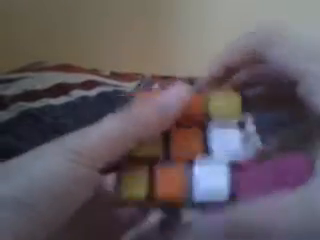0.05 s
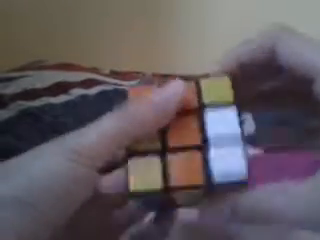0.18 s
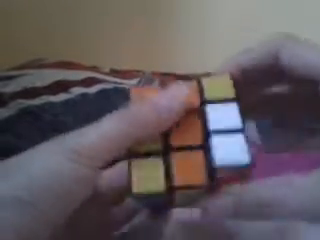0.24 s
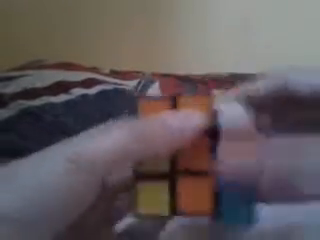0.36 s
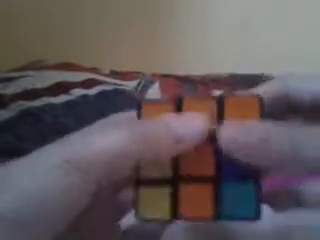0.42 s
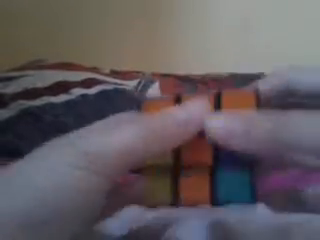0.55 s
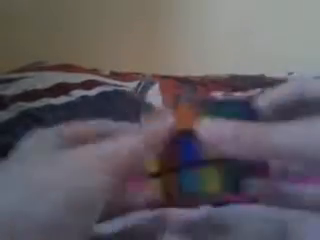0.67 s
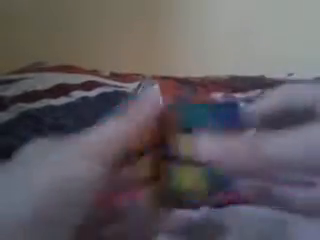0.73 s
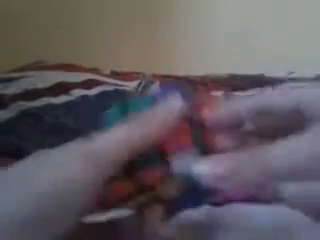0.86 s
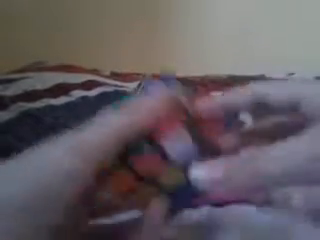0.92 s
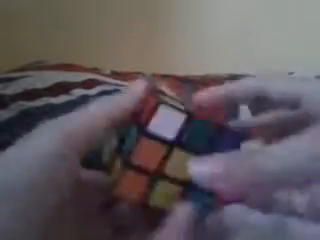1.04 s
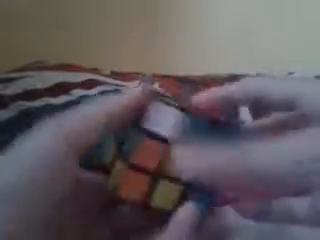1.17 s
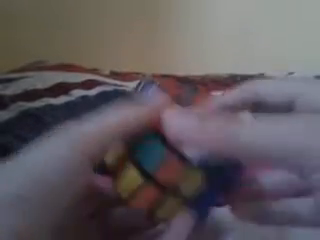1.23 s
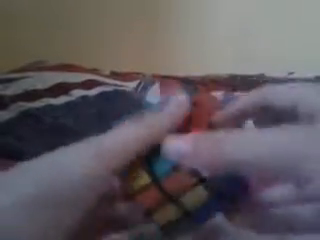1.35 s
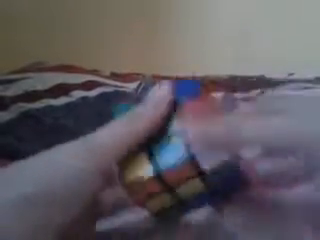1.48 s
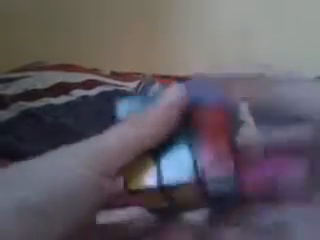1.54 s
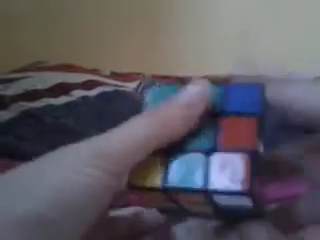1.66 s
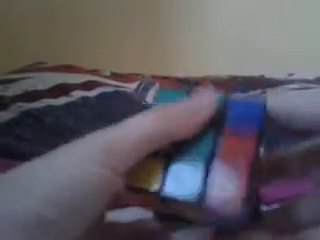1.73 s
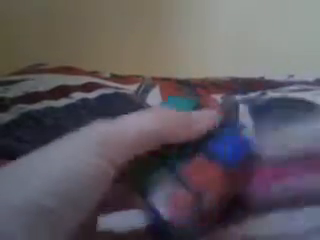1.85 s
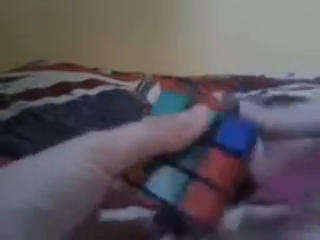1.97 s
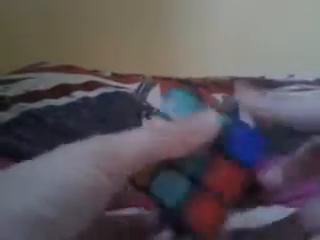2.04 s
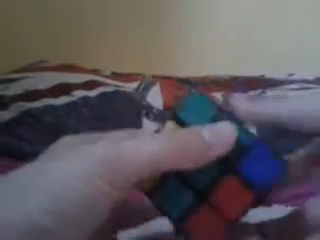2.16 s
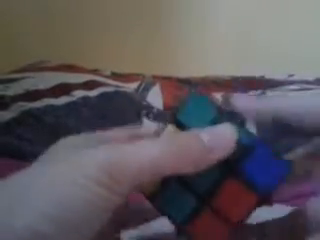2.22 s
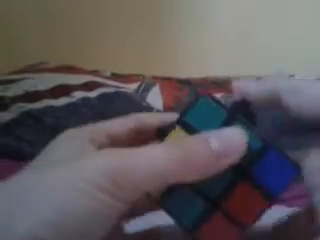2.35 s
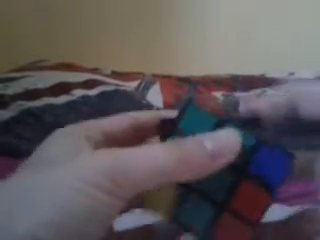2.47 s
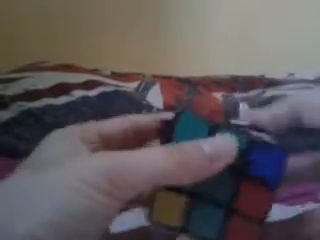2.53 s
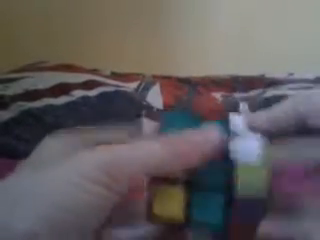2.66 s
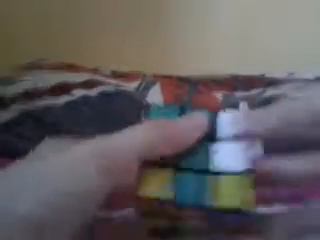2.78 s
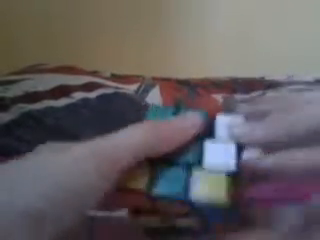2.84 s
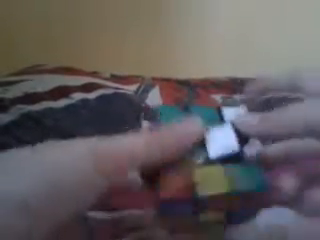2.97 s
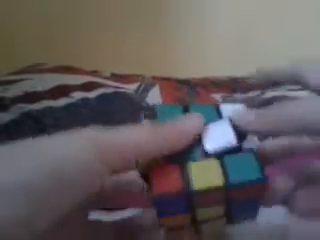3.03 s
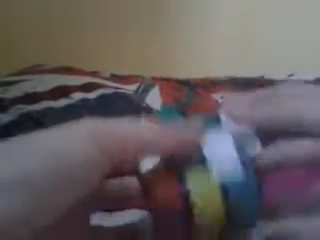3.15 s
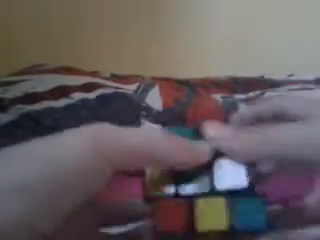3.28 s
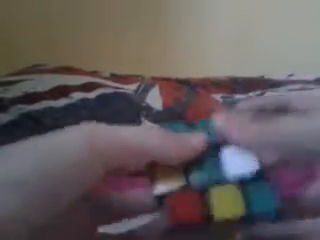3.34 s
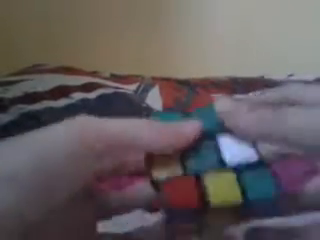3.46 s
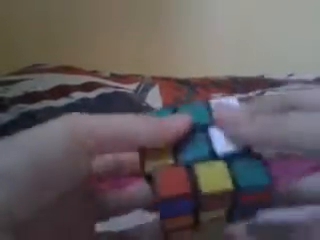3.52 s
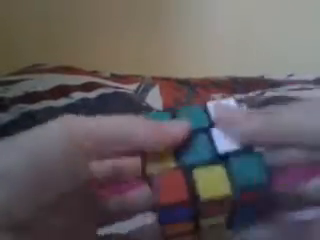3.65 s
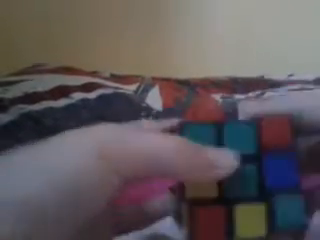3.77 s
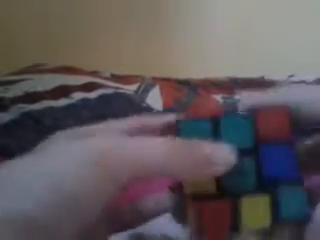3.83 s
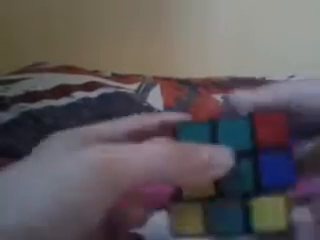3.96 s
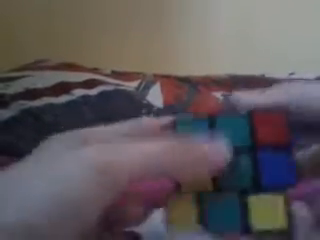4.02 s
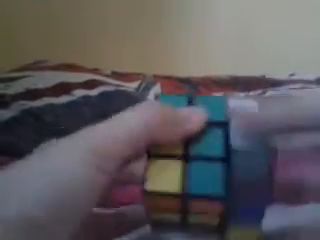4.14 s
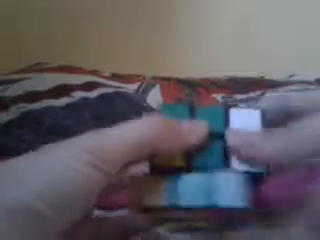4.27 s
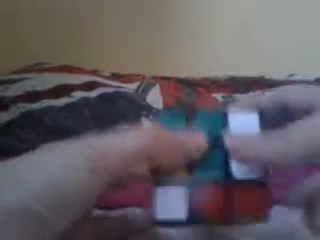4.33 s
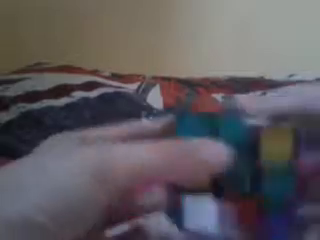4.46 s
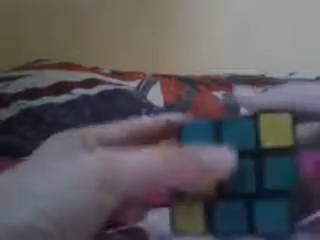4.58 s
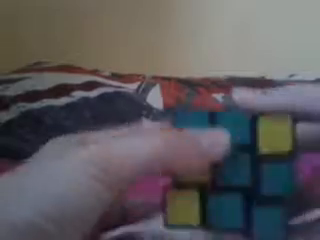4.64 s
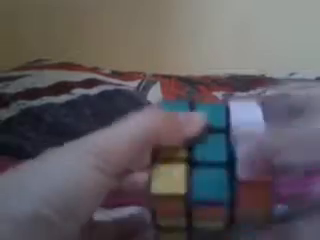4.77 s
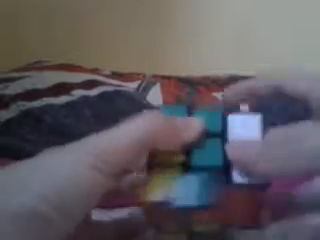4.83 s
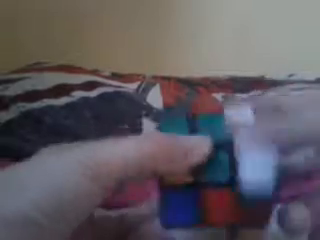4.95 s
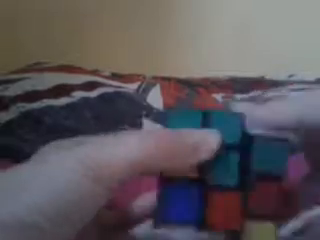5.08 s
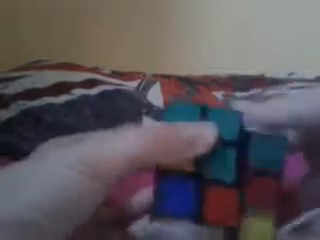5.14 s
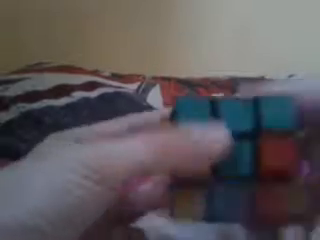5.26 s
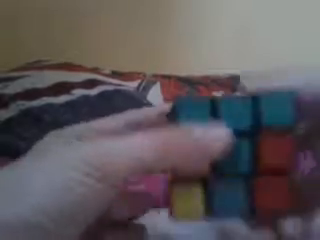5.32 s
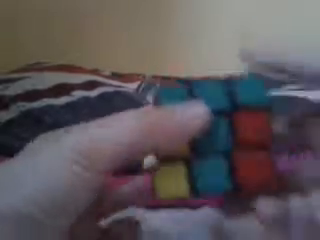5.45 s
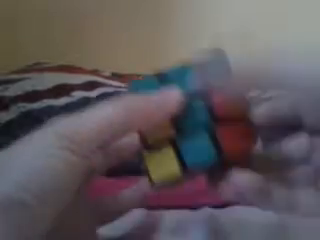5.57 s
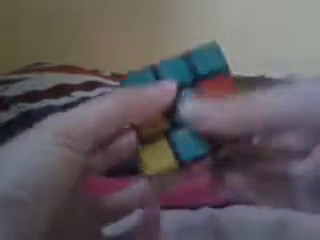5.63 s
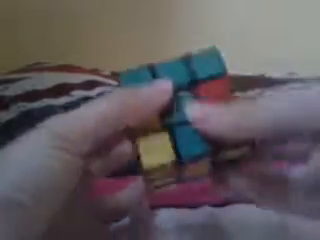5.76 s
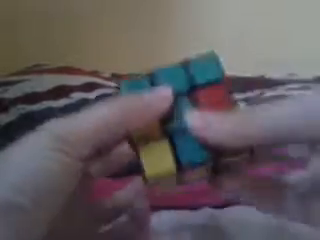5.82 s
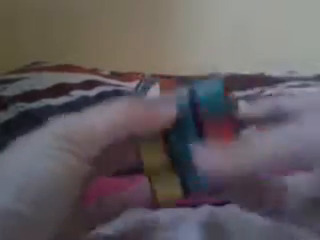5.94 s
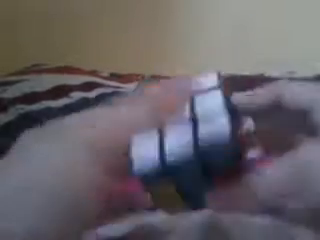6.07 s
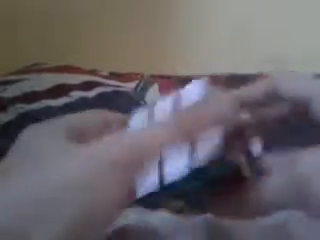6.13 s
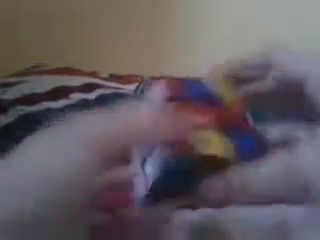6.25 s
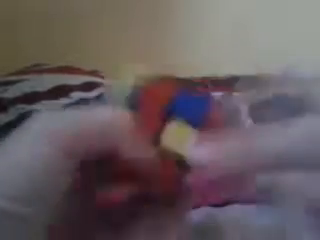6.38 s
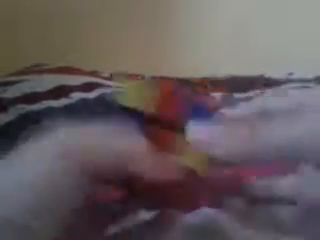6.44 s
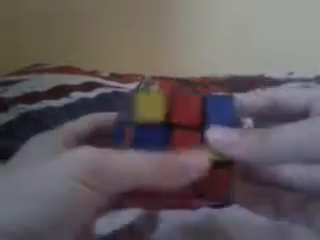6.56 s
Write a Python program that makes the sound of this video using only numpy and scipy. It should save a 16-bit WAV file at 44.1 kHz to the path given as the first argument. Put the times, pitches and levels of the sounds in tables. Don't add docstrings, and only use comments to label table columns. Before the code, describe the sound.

Over faint room hush and low rumble, fingers tick lightly on a hollow plastic puzzle cube, with one sharper clack near 0.2 s. Sparse touches and a near-quiet gap follow until a small scrape at 1.3 s. A gritty cluster of clacks comes at about 1.6 s, another around 2.5 s and a very hard one near 2.8 s, with light ticks between. Turns resume at 3.5 s and speed up from 3.7 s into a dense run of clacks, grinding and loose rattle, strongest around 4.1 to 4.8 s. A last hard burst lands near 5.05 s. After that only weak, scattered ticks continue, one a little clearer near 6.25 s, until about 6.5 s. Everything is close and dry in a soft-furnished room, through a narrow-band small microphone that overloads harshly on the loudest clacks.

```python
import sys
import numpy as np
from scipy import signal
from scipy.io import wavfile
from scipy.ndimage import uniform_filter1d

SR = 44100
rng = np.random.default_rng(int(sys.argv[2]) if len(sys.argv) > 2 else 0)


def wrap_up_sound(samples):
    columns = np.atleast_2d(samples).T
    tamed = np.clip(columns, -1, 1)
    steps = np.round(tamed * 32767).astype(np.int16)
    wavfile.write(sys.argv[1], SR, steps)


def ratio_of_db(decibels):
    return 10 ** (np.asarray(decibels, float) / 20)


N = 291048
RING = 400


def evened(x):
    return x / np.sqrt(np.mean(x ** 2) + 1e-20)


def read(points, hz):
    f, value = np.transpose(points)
    return np.interp(np.log(hz + 1), np.log(f + 1), value)


def add(mix, s, sound):
    part = mix[max(round(s * SR), 0):][:len(sound)]
    part += sound[:len(part)]


def loudest(x):
    power = uniform_filter1d(abs(signal.hilbert(x)) ** 2, size=44)
    return power.argmax(), np.sqrt(power.max())


# [t/s, peak level/dB, shell share/dB, cavity share/dB]
FIRST_CLACKS = [(.178, -11, -12.5, -7.5), (1.5812, -17, -15, -10), (1.6414, -20.5, -5.5, -17),
                (1.6539, -16, -7, -14), (1.6572, -18, -4, 14), (1.661, -3.5, -19.5, -7),
                (1.6655, -21.5, 3, -18), (2.4524, -19.5, -5, -6.5), (2.4558, -13, -7, -4.5),
                (2.472, -21.5, -11, -18.5), (2.4863, -12, -16, -4.5), (2.687, -24.5, -11, -16.5),
                (2.7505, -13, -16.5, -3), (2.7695, -1, -9.5, -23.5), (2.773, 0, -17, -16.5),
                (2.7773, -16, -40.5, -12), (2.7863, -3.5, -38, -7), (2.7952, -22.5, -12, -10),
                (3.4995, -15, -20.5, -23), (3.5276, -18.5, -7.5, -11), (3.5308, -16, -10, -7),
                (3.5503, -21.5, -8, -10.5), (3.5576, -17.5, -7.5, -2), (3.5645, -16, -38.5, -11),
                (3.7232, -21.5, -11, -5.5), (3.7403, -11.5, -18.5, -1.5), (3.7493, -4, -27, -18),
                (3.8766, -23, -7.5, -3.5), (3.9364, -4.5, -14, -10.5), (3.9422, -6, -12, -6)]
# [t/s, peak level/dB, shell share/dB, cavity share/dB]
FAST_CLACKS = [(4.12, -8.5, -28.5, -3.5), (4.1227, -2, -15.5, -22), (4.1288, -4.5, -14, -9),
               (4.1319, -5.5, -24, -1), (4.2422, -10, -30, -17), (4.2448, -5, -35.5, -16.5),
               (4.2827, -16, -5, -3), (4.2953, -10.5, -15, -21.5), (4.3275, -17.5, -12, -1.5),
               (4.347, -4.5, -13, -22.5), (4.3572, -13, -14.5, -26.5), (4.5072, -15.5, -10.5, -9),
               (4.5151, -12, -21.5, 5.5), (4.5207, -14.5, -21.5, -6.5), (4.5368, -12.5, -8, -1),
               (4.6622, -10, -27, -20.5), (4.6751, -8.5, -27, -13), (4.6807, -1.5, -17.5, -9),
               (4.6847, -4, -22, -5.5), (4.6864, 1, -21, -15), (4.6932, -15.5, -18.5, -3.5),
               (4.6964, -6, -16, -9.5), (4.7069, -17.5, -28, -28), (4.796, -14.5, -26, -2),
               (5.001, -13, -6, -4), (5.0559, -11, -20, -2), (5.0711, -5.5, -25, -19),
               (5.0803, -8, -38, -14), (5.0842, -4, -14.5, -7), (5.0913, -15.5, -33, -6)]
# [t/s, peak level/dB, shell share/dB]
GRIP_TICKS = [(.0363, -38.5, -17), (.0533, -37, -3), (.0902, -36.5, -4), (.0963, -39, 1.5),
              (.114, -35.5, -1), (.1452, -36.5, -9), (.169, -28, -7), (.2034, -41, -3), (.2214, -35.5, 1),
              (.249, -40.5, -2), (.302, -44, -7), (.3408, -30, -6), (.3828, -28.5, -6), (.4193, -43, -9),
              (.4518, -42, -3.5), (.487, -39.5, -19), (.5085, -30, -28), (.631, -30.5, -36),
              (.6601, -36.5, -29), (.6888, -27, -7), (.7022, -37, -7), (1.143, -39, -2),
              (1.1985, -44, -3.5), (1.3991, -43.5, -6), (1.474, -37.5, -6.5), (1.718, -36, -1.5),
              (1.753, -34.5, -2), (1.7793, -27, -6), (1.91, -29, -10), (2.0122, -40.5, -11)]
# [t/s, peak level/dB, shell share/dB]
TURN_TICKS = [(2.1064, -31, -9), (2.213, -39, -5.5), (2.275, -35, -5), (2.3428, -27.5, -4.5),
              (2.424, -35, -3), (2.519, -34, -5), (2.5292, -26.5, -2.5), (2.738, -40, -11.5),
              (2.9414, -36.5, -2.5), (3.0374, -38.5, -5), (3.118, -33.5, -31), (3.142, -43, -4),
              (3.189, -38, -2), (3.3289, -36, -2.5), (3.346, -37.5, -2.5), (3.3667, -40.5, -3),
              (3.43, -39.5, -2.5), (3.467, -29, -1.5), (3.4952, -24.5, -0.5), (3.6311, -33, -4),
              (3.7794, -27, -13.5), (4.0171, -31.5, -5), (4.106, -27, -13.5), (4.1804, -23.5, -7.5),
              (4.4448, -25, -11), (4.4685, -21.5, -0.5), (4.4895, -24, -12.5), (4.5941, -27, -5),
              (4.6175, -29, -16.5), (4.7354, -21, -6.5)]
# [t/s, peak level/dB, shell share/dB]
LAST_TICKS = [(4.7749, -27, -10.5), (4.9607, -34.5, -11), (4.9708, -30.5, -9), (4.9961, -21.5, -29),
              (5.0444, -23, -19), (5.0467, -21.5, -4.5), (5.0631, -18, -3.5), (5.3116, -31.5, -4.5),
              (5.4332, -35.5, -9), (5.4722, -42, -2), (5.4866, -33, -1.5), (5.4934, -27.5, -9.5),
              (5.5113, -37.5, -4), (5.6257, -32, -38), (5.6937, -43.5, -1.5), (5.7707, -43.5, -2.5),
              (5.8143, -41.5, -21), (5.9896, -32, -4), (6.0224, -42, -4), (6.0691, -41.5, -8),
              (6.0913, -46.5, -12), (6.1494, -48, -3), (6.1798, -42.5, -4.5), (6.2388, -25, -7),
              (6.2802, -33, -13), (6.3137, -40.5, -4.5), (6.4872, -44, -30), (6.517, -32.5, -7.5),
              (6.5396, -44, -10)]
# [t/s, peak level/dB, shell share/dB]
NOTCHES = [(6.3718, -48, -20), (6.3846, -44, -4), (1.3006, -42, -5), (1.3139, -37, -1.5),
           (1.5295, -34.5, -6), (1.5422, -29, -4.5), (1.56, -33, -8), (1.569, -24, -11.5),
           (1.5936, -38, -29), (1.6698, -29, -15), (2.611, -28, -4.5), (2.6244, -30, -7),
           (2.6296, -29.5, -8.5), (2.65, -28.5, -17.5), (2.656, -27.5, -2.5), (3.102, -39.5, -19),
           (3.1585, -38.5, -3), (3.249, -45.5, -5), (3.5178, -29, -3), (3.65, -39, -1),
           (3.8644, -29.5, -2.5), (3.8982, -29.5, -12), (3.9633, -34.5, -0.5), (4.0559, -28.5, -3.5),
           (4.085, -31, -18), (4.0966, -32.5, -22), (4.2177, -30, -4), (4.2766, -20.5, -17),
           (4.4261, -29, -3), (4.6335, -27.5, -3)]


def catches():
    rows = [*FIRST_CLACKS, *FAST_CLACKS]
    for row in [*GRIP_TICKS, *TURN_TICKS, *LAST_TICKS, *NOTCHES, *slips()]:
        rows.append(None if row is None else (*row, light_cavity(row[2])))
    chance = rng.standard_normal((len(rows), 3, RING + 7))
    out = np.zeros(N)
    for row, c in zip(rows, chance):
        if row is None:
            continue
        s, peak_db, shell_db, cavity_db = row
        detune, lean_db = 1 + .04 * c[:, 0], 2.5 * c[:, 1:7]
        grit = c[:, 7:] * abs(c[:, 7:])
        sound = catch(peak_db, shell_db, cavity_db, grit, detune, lean_db)
        add(out, s - loudest(sound)[0] / SR, sound)
    return out


def light_cavity(shell_db):
    return -2.5 - 7 * ratio_of_db(shell_db) ** 2


# [start t/s, length/s, peak level/dB]
SCRAPES = [(1.287, .05, -51.5), (1.541, 0.041, -40), (1.669, 0.0091, -37), (2.199, .045, -49),
           (2.591, .015, -41.5), (2.62, 0.026, -39.5), (2.707, .012, -38), (2.805, .012, -30.5),
           (5.048, 0.043, -22), (4.785, 0.019, -30.5), (2.993, .011, -46), (3.506, .065, -28.5),
           (3.682, .012, -45), (3.699, .008, -34.5), (3.729, .02, -17.5), (3.836, .03, -44.5),
           (3.869, 0.048, -36), (3.931, .008, -28.5), (4.062, 0.038, -33), (4.131, .008, -26.5),
           (4.185, .008, -34), (4.207, .03, -31.5), (4.262, .014, -32.5), (4.324, 0.024, -27),
           (4.409, 0.01, -37.5), (4.511, .046, -24.5), (4.639, 0.028, -34.5), (4.663, .064, -27.5),
           (4.869, .032, -47), (0.184, .06, -45)]


def slips():
    gap_s, uneven, spread_db = .0058, 0.36, 3.5
    shell_db, shell_spread_db = -5.5, 3.5
    chance, rows = rng.standard_normal((len(SCRAPES), 16, 3)), []
    for (start, length, db), (gap, size, tone) in zip(SCRAPES, chance.transpose(0, 2, 1)):
        gap = gap_s * np.exp(uneven * gap)
        at = start + np.cumsum(gap) - gap
        table = np.c_[at, db + spread_db * size, shell_db + shell_spread_db * tone]
        rows += [row if row[0] < start + length else None for row in table]
    return rows


# [f/Hz, width/Hz, level/dB]
SHELL = [(570, 436, -14), (924, 570, -5), (1300, 573, 0.5), (1735, 667, -0.5)]
# [f/Hz, width/Hz, level/dB]
CAVITY = [(2583, 470, -1.08), (2943, 330, 0), (3697, 940, -3.5)]
# [f/Hz, width/Hz, level/dB]
EDGES = [(4599, 350, -8.5), (4900, 1000, -7.5), (5628, 450, 1), (6480, 840, -2.5), (6686, 270, -4),
         (9160, 1300, -6)]


def catch(peak_db, shell_db, cavity_db, grit, detune, lean_db, skid_ms=0.87, longer=.01, rise=.4):
    length_ms = skid_ms * ratio_of_db(longer * 10 * (peak_db + 28.0))
    u = np.arange(RING) / SR * 1000 / length_ms
    skid = u ** rise * np.exp(-1.5 * u)
    shell, cavity = ratio_of_db(shell_db), ratio_of_db(cavity_db)
    edges = np.sqrt(max(1 - shell ** 2 - cavity ** 2, .03))
    bare = np.diff(skid * grit[0], prepend=0)
    sound = ratio_of_db(-9) * bare / loudest(bare[1:])[1]
    parts = zip((SHELL, CAVITY, EDGES), (shell, cavity, edges), grit, detune, lean_db)
    for modes, share, taps, d, lean in parts:
        blow = skid * (taps + grit[0])
        part = np.convolve(blow, ring(modes, d, lean))[:RING]
        sound = sound + share * part / loudest(part)[1]
    fade = signal.windows.tukey(2 * RING, .4)[RING:]
    return ratio_of_db(peak_db + 0.95) * sound / loudest(sound)[1] * fade


def ring(modes, detune, lean_db=0):
    t = np.arange(RING) / SR
    sound = 0
    for k, ((hz, width, db), lean) in enumerate(zip(modes, lean_db + np.zeros(6))):
        decay = np.exp(-np.pi * width * t)
        sound = sound + (-1) ** k * ratio_of_db(db + lean) * decay * np.sin(2 * np.pi * hz * detune * t)
    return sound


def rattle(hits, per_s=2500, before_s=0.0026, settle_s=0.0014, rattle_db=-11, spread=.07):
    early, late = np.exp(-1 / (before_s * SR)), np.exp(-1 / (settle_s * SR))
    power = signal.lfilter([1 - early], [1, -early], hits[::-1] ** 2)[::-1]
    shake = np.sqrt(abs(signal.lfilter([1 - late], [1, -late], power)))
    size = ratio_of_db(3 * np.minimum(rng.exponential(1, N), 4))
    ticks = (rng.random(N) < per_s / SR) * rng.choice([-1., 1.], N) * size
    piece, sound = rng.integers(0, 9, N), 0
    for k, (modes, db) in enumerate([(SHELL, .6), (CAVITY, -1.1), (EDGES, .1)] * 3):
        answer = ratio_of_db(db) * ring(modes, .98 + spread * (k // 3 - 1))
        sound = sound + signal.oaconvolve(ticks * (piece == k), answer)[:N]
    return np.hypot(ratio_of_db(rattle_db) * shake, grind()) * evened(sound)


def grind(under_db=-13.5, edge_s=.006):
    level = np.zeros(N)
    for start, length, db in SCRAPES:
        add(level, start, np.full(round(length * SR), ratio_of_db(db + under_db)))
    edge = round(edge_s * SR)
    return np.convolve(level, signal.windows.hann(2 * edge) / edge, "same")


# [f/Hz, t60/s]
WALLS = [(300, 0.26), (1500, 0.11), (3000, 0.14), (7000, 0.15)]


def room(x):
    taps = np.zeros(SR // 2)
    at = np.arange(180, SR // 2 - 20, 20)
    taps[at + rng.integers(0, 20, at.shape)] = rng.choice([-1., 1.], at.shape)
    hz, t, z = signal.stft(taps, SR, nperseg=128)
    decay = ratio_of_db(-60 * t / read(WALLS, hz)[:, None])
    tail = signal.istft(z * decay, SR, nperseg=128)[1]
    return signal.fftconvolve(x, tail / np.linalg.norm(tail))[:N]


# [f/Hz, level/dB per Hz]
RUMBLE = [(8, -1), (25, 4), (45, -5), (100, -37)]
# [f/Hz, level/dB per Hz]
AIR = [(170, -13), (300, -5), (630, -3), (1300, -7.5), (2600, -10.5), (4500, -13.5), (6900, -14.5),
       (9500, -10)]


def hush(level_db=-54.5, patchy_db=.6, drift_db=1.8):
    frames, hz = N // 512 + 5, np.fft.rfftfreq(2048, 1 / SR)
    a, b, patches = rng.standard_normal((frames, 1025, 3)).T
    drift = evened(uniform_filter1d(patches[0], size=14)) * (hz[:, None] < 100)
    patches = uniform_filter1d(patches, size=20, axis=0)
    patches = evened(uniform_filter1d(patches, size=8, axis=1))
    colour_db = read([*RUMBLE, *AIR], hz)[:, None]
    z = (a + 1j * b) * ratio_of_db(colour_db + patchy_db * patches + drift_db * drift)
    return ratio_of_db(level_db) * evened(signal.istft(z, nperseg=2048, noverlap=1536)[1][:N])


def scene():
    hits = catches()
    loose = rattle(hits)
    small = signal.butter(4, 520, "high", fs=SR, output="sos")
    sideways = ratio_of_db(-17) * hits + ratio_of_db(-6) * loose
    cube, sideways = signal.sosfilt(small, [hits + loose, sideways])
    return (cube + room(sideways) + hush())[None]


def low_pass(x):
    return signal.sosfilt(signal.butter(12, 16980, fs=SR, output="sos"), x)


def record(dry, edge_hz=7060, skirt_hz=9300, skirt_db=-38, top_hz=16000, ceiling=.74):
    band = signal.cheby1(11, .5, edge_hz, fs=SR, output="sos")
    skirt = signal.cheby1(10, .5, skirt_hz, fs=SR, output="sos")
    top = signal.cheby1(10, .5, top_hz, fs=SR, output="sos")
    narrow = signal.sosfilt(band, dry) + ratio_of_db(skirt_db) * signal.sosfilt(skirt, dry)
    clipped = signal.sosfiltfilt(top, np.clip(narrow, -ceiling, ceiling))
    return low_pass(clipped)


dry = scene()
out = record(dry)
wrap_up_sound(out)
```